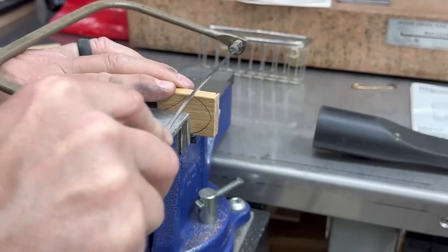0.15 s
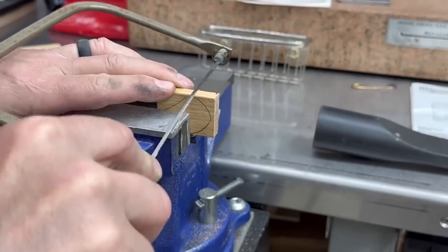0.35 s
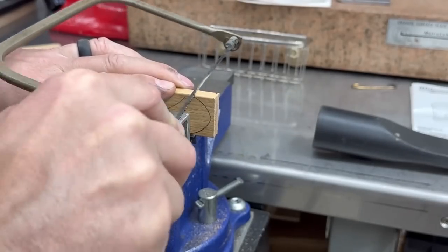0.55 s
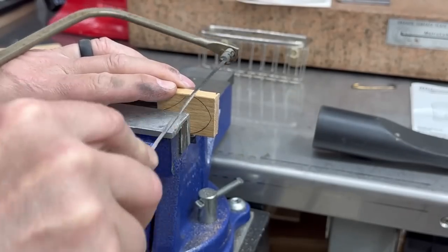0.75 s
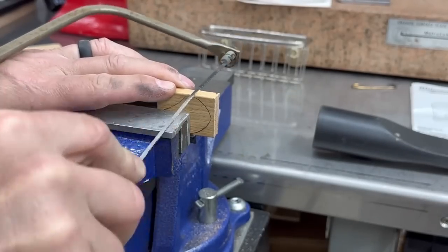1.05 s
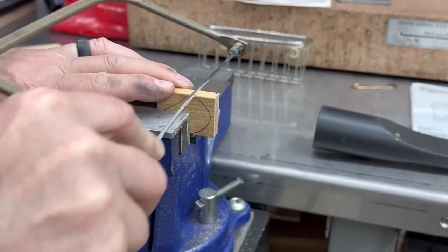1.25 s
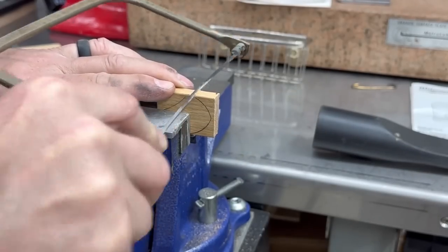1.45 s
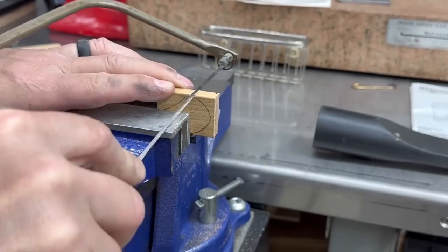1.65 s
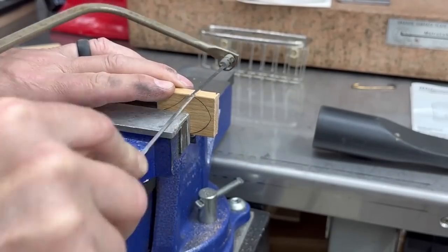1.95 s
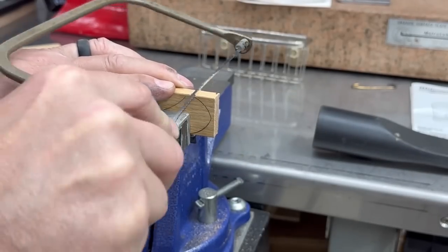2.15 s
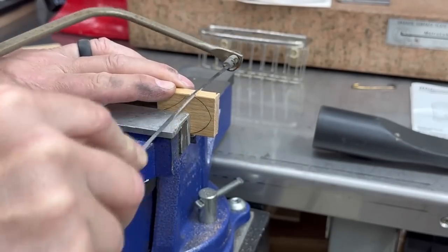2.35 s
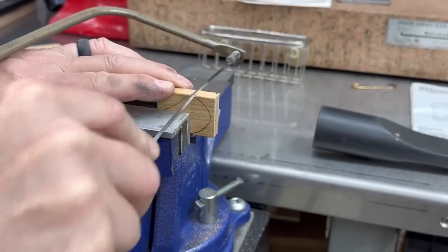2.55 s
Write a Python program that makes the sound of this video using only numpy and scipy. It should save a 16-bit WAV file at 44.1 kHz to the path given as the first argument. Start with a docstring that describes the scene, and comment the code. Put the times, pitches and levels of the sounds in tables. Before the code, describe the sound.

Quick dry sawing of a small wood block with a thin metal blade, steady and close

```python
"""In a dry workshop a jeweler's saw cuts a small wooden block in a vise, close to a stereo microphone.
Pulls and pushes alternate, about six strokes a second; tooth ticks and fibre crackle drive the dry rasp
and ring blade and block, while noise that follows the cutting force rings the bench.
Most pulls open with a tick and a soft thump; snags ping, the frame hums and a thin steel note swells once.
Steady room tone and a faint room tail lie around the saw; a short opposed echo gives a little width."""
import sys
import numpy as np
from scipy import signal
from scipy.fft import rfft, irfft, next_fast_len
from scipy.io import wavfile
from scipy.ndimage import uniform_filter1d

SR = 44100
rng = np.random.default_rng(int(sys.argv[2]) if len(sys.argv) > 2 else 0)


def to_wav(sig):
    """Store sig (one row per channel, or 1-D mono) as 16-bit WAV at the path in sys.argv[1].

    Samples outside -1..1 are clipped; the rate is SR.
    """
    pcm = np.clip(np.atleast_2d(sig), -1, 1) * 32767
    pcm = np.round(pcm).astype(np.int16)
    wavfile.write(sys.argv[1], SR, pcm.T)  # frames by channels


N = 119070

# Room tone behind the saw. Each row: frequency in Hz, relative density in dB per Hz.
ROOM_TONE_COLOUR = [(20, -1), (40, -3), (65, 4), (120, 4.5), (250, -2.5), (500, -18.5), (1000, -16.5),
                    (3500, -12), (7000, -23), (15000, -34)]
# Echo that is opposite in the two channels. Each row: frequency in Hz, gain in dB.
SIDE_LEVEL = [(60, -25), (250, -17), (400, -12), (600, -0.5), (800, -10), (1100, -9), (2100, -48),
              (3400, -14.5), (4300, -18), (5800, -39), (7200, -7), (8200, -56.5), (9400, -5), (11500, -35),
              (13600, -8), (15500, -15)]
# Phase by which the left microphone leads the right. Each row: frequency in Hz, lead in radians.
LEFT_LEAD = [(20, 0), (2600, .02), (3000, .45), (3400, .6), (4200, .33), (4900, .06), (6700, .03),
             (7300, 1), (7850, 3.08), (8700, 3.1), (9050, 1.9), (9800, .5), (10700, 0), (13000, 0),
             (13700, -.9), (14700, -1.4), (15600, -2.7)]
# Swells of the sprung frame. Each row: crest in seconds, level in dB.
HUMS = [(0.171, -48.5), (.52, -46.5), (.68, -48), (.85, -48.5), (1.01, -43), (1.186, -43.5), (1.315, -41.5),
        (1.495, -43), (1.631, -43.5), (1.82, -51), (1.98, -47), (2.16, -48.5), (2.275, -43.5)]
# Modes of the bench. Each row: frequency in Hz, width in Hz, relative level in dB.
BENCH_MODES = [(65.5, 48, -8), (130.7, 15.1, 0.5), (162.6, 28.2, -7.5), (228.5, 21.5, -0.5), (367, 43, -8),
               (524, 99, -16)]
# Modes of block and vise. Each row: frequency in Hz, width in Hz, relative level in dB.
BLOCK_MODES = [(642, 15, -5), (908.5, 19, 3), (1120, 120, -5), (1278, 13.6, 4), (1506, 25.5, 2),
               (1773, 50, 5.5), (1897, 86, -4), (2058, 82, 1), (2549, 36, 4)]
# Modes of blade and frame. Each row: frequency in Hz, width in Hz, relative level in dB.
BLADE_MODES = [(2503, 35, -12), (2710, 19, -11.5), (3136, 76, 0.5), (3358, 52, 4), (3498, 58, 0),
               (3695, 123, -1.5), (3896, 94, -6), (4158, 39, -5), (4313, 210, -9.5), (4566, 71, -8.5),
               (5050, 89, -16.5), (5390, 56, -10), (5664, 27, -15.5), (7430, 35, -11)]
# Colour of the dry rasp. Each row: frequency in Hz, relative density in dB per Hz.
RASP_COLOUR = [(200, -20.5), (750, -14.5), (1500, -11.5), (2850, -2), (3400, 7.5), (4400, 1), (6100, -3.5),
               (7200, -2), (7700, -7.5), (8300, 3), (9200, -9.5), (10500, -13), (12000, -16),
               (13100, -18.5), (13750, -10), (15000, -11.5), (15800, -28)]
# A tooth tears a fibre. Each row: start in seconds, level in dB.
SNAGS = [(.1145, -28.5), (.329, -29), (.986, -25.5), (1.124, -27.5), (1.158, -29), (1.6095, -33),
         (1.938, -17), (2.119, -23), (2.406, -36)]
# Teeth catch at the start of a pull. Each row: start in seconds, tick drive in dB, bench thump in dB.
BITES = [(0.2524, -37, -42.5), (0.5864, -47, -48), (.912, -41, -48), (1.23, -30, -40), (1.541, -32, -37),
         (1.876, -32, -36.5), (2.199, -23.5, -40), (2.505, -30.5, -48)]
# Pull and push in turn. Each row: start in seconds, then drive of rasp, blade, block and bench in dB.
STROKES = [(-.105, -42, -39.5, -50.5, -46), (.055, -45, -38, -49.5, -48), (.224, -43.5, -38, -50.5, -49),
           (.396, -44, -40.5, -52, -54.5), (.566, -42.5, -40, -48.5, -42.5),
           (.736, -44.5, -37.5, -48, -49.5), (.895, -41.5, -40, -46, -45), (1.056, -43, -36, -48.5, -53),
           (1.208, -41.5, -37, -50.5, -48), (1.371, -42.5, -35, -48.5, -48), (1.524, -41.8, -38, -50, -47),
           (1.69, -41, -35.5, -49, -49), (1.851, -41, -35, -48, -46.5), (2.016, -42, -33.4, -44.5, -50.5),
           (2.174, -40, -36, -45.5, -41.5), (2.336, -41.9, -35, -43.5, -50),
           (2.489, -40, -34.5, -44.5, -44), (2.649, -37.5, -32, -48.5, -49)]
LAST_TURN_S = 2.853  # end of the last stroke

# Place and microphone
ROOM_TONE_DB = -54.5
NEAR_DB, NEAR_T60_S = -2.5, 0.048  # short tail close to the saw
ROOM_DB, ROOM_T60_S = -22.5, 0.67
BASS_LEFT_DB = 1.7  # bass in the left channel over the right
LOW_CUT_HZ, EDGE_HZ = 33, 15800

# Frame, steel note, thumps, snags and ticks
HUM_HZ, HUM_SPREAD, HUM_WIDTH_S = 249.2, 0.02017, 0.03  # spread: share of the pitch
NOTE_CREST_S, NOTE_SWELL_S, NOTE_DECAY_S = 1.33, .08, .06
NOTE_HZ, NOTE_DB = 1269, -53.5
THUMP_LAG_S, THUMP_RISE_S = 0.014, .014
THUMP_HZ, THUMP_GLIDE_HZ_PER_S = 96, 750
SNAG_RISE_S, TICK_DECAY_S = 0.001, 0.0045

# Hand and cut
PULL_STICK_S, PUSH_STICK_S, STOP_S = .016, .015, .006  # the blade rests around each turn
PULL_SKEW, PUSH_SKEW = .88, 1.03  # where in the stroke the speed peaks
PULL_POWER, PUSH_POWER = 0.97, 1.3  # how force follows speed
PULL_DRAG, PUSH_DRAG, DRAG_RISE_S = 0.29, 0.18, 0.0017  # friction as soon as the blade may move
TEETH_PER_S, TOOTH_JITTER, TOOTH_SPREAD_DB = 900, .25, 2  # typical rate at top speed
FIBRES_PER_S, FIBRE_SPREAD_DB = 9000, 3.5
CHATTER_HZ, CHATTER_DB = 168, 0.46
PATCH_HZ, PATCH_DB = 43, 1.09  # each part is driven a little unevenly as the contact shifts
RASP_DB, BLADE_DB, BLOCK_DB, BENCH_DB = 3, -2, -2.5, -3.5  # gains on the stroke drives


def amp(db):
    """Decibels to gain."""
    return 10 ** (np.asarray(db) / 20)


def unit(x):
    """Scales to rms 1."""
    return x / np.sqrt(np.mean(x ** 2) + 1e-20)


def read(points, hz):
    """Reads a table on a log-frequency axis."""
    f, value = np.transpose(points)
    return np.interp(np.log(hz + 1), np.log(f + 1), value)


def add(mix, s, sound):
    """Mixes a sound in at time s in seconds."""
    part = mix[max(round(s * SR), 0):][:len(sound)]
    part += sound[:len(part)]


def filtered(x, response):
    """Applies a frequency response, given as a function of Hz."""
    size = next_fast_len(N + SR // 2)
    hz = np.fft.rfftfreq(size, 1 / SR)
    return irfft(rfft(x, size) * response(hz), size)[..., :N]


def colour(x, points):
    """Shapes the spectrum, keeping the power of white noise."""
    return filtered(x, lambda f: unit(amp(read(points, f))))


def ring(x, modes):
    """Rings decaying modes, wider ones dying sooner, keeping the power of white noise."""
    t = np.arange(SR // 4) / SR
    h = np.zeros(len(t))
    for k, (hz, width, db) in enumerate(modes):
        decay = np.exp(-np.pi * abs(width) * t)
        h += (-1) ** k * amp(db) * width * decay * np.cos(2 * np.pi * hz * t)
    return signal.fftconvolve(x, h / np.linalg.norm(h))[:N]


def wander(rate_hz):
    """Smooth chance of rms 1, slower than about rate_hz."""
    return unit(filtered(rng.standard_normal(N), lambda f: 1 / (1 + (f / rate_hz) ** 4)))


def room_tone():
    """Steady noise with the colour of the quiet room."""
    return amp(ROOM_TONE_DB) * colour(rng.standard_normal(N), ROOM_TONE_COLOUR)


def echoes(x, t60):
    """A tail of sparse reflections of either sign that falls 60 dB in t60 seconds."""
    t = np.arange(SR // 2) / SR
    sign = rng.choice([-1., 1.], len(t))
    present = (rng.random(len(t)) < 2000 / SR) * (t > .001)
    taps = sign * present * amp(-60 * t / t60)
    return signal.fftconvolve(x, taps / np.linalg.norm(taps))[:N]


def frame_hums():
    """Soft swelling notes of the sprung frame's lowest mode, each a little detuned."""
    out, t = np.zeros(N), np.arange(N) / SR
    for crest, db in HUMS:
        detune, phase = rng.uniform(-1.017, 1, 2)
        tone = np.sin(2 * np.pi * (HUM_HZ * (1 + HUM_SPREAD * detune) * t + phase))
        out += amp(db) * np.exp(-((t - crest) / HUM_WIDTH_S) ** 2) * tone
    return out


def steel_note():
    """A thin steel note that swells and fades once, its phase wavering."""
    t = np.arange(N) / SR - NOTE_CREST_S
    swell = np.exp(-(t / np.where(t < 0, NOTE_SWELL_S, NOTE_DECAY_S)) ** 2)
    return amp(NOTE_DB) * swell * np.sin(2 * np.pi * NOTE_HZ * t + 0.28 * wander(25))


def bench_thumps():
    """The bench takes the load of each bite with a soft thump of rising pitch."""
    out, t = np.zeros(N), np.arange(SR // 8) / SR
    u = t / THUMP_RISE_S
    swell = (u * np.exp(1 - u)) ** 2
    for s, _, db in BITES:
        turns = THUMP_HZ * t + THUMP_GLIDE_HZ_PER_S * t ** 2 / 2 + rng.random()
        add(out, s + THUMP_LAG_S, amp(db) * swell * np.sin(2 * np.pi * turns))
    return out


def snags():
    """A caught tooth lets go and the blade pings for a moment at one of its modes."""
    out, t = np.zeros(N), np.arange(SR // 30) / SR
    u = t / SNAG_RISE_S
    ping = u * np.exp(1 - u) * np.sin(2 * np.pi * BLADE_MODES[3][0] * t)
    for s, db in SNAGS:
        add(out, s, amp(db) * ping)
    return out


def bite_ticks():
    """Short decaying bursts of noise as the teeth catch."""
    out, t = np.zeros(N), np.arange(SR // 30) / SR
    for s, db, _ in BITES:
        add(out, s, amp(db) * np.exp(-t / TICK_DECAY_S) * rng.standard_normal(len(t)))
    return out


def hand():
    """The arm swings to and fro: stroke number, blade speed and cutting force at each moment."""
    t = np.arange(N) / SR
    turns = np.array([row[0] for row in STROKES] + [LAST_TURN_S])
    stroke = np.clip(np.searchsorted(turns, t) - 1, 0, len(STROKES) - 1)
    pull = stroke % 2 == 0
    start = turns[stroke] + np.where(pull, PULL_STICK_S, PUSH_STICK_S)
    progress = np.clip((t - start) / (turns[stroke + 1] - STOP_S - start), 0, 1)
    speed = abs(np.sin(np.pi * progress ** np.where(pull, PULL_SKEW, PUSH_SKEW)))
    onset = np.clip((t - start) / DRAG_RISE_S, 0, 1)
    drag = np.where(pull, PULL_DRAG, PUSH_DRAG) * onset * (1 - progress)
    force = drag * (1 - speed) + speed ** np.where(pull, PULL_POWER, PUSH_POWER)
    return stroke, speed, force


def tooth_ticks(speed):
    """One uneven tick per tooth, coming faster with blade speed."""
    rate = TEETH_PER_S * (.4 + .6 * speed) * np.exp(TOOTH_JITTER * wander(300))
    passing = np.diff(np.floor(np.cumsum(rate) / SR), prepend=0)
    teeth = passing * amp(TOOTH_SPREAD_DB * np.clip(rng.standard_normal(N), -2, 1.5))
    return unit(teeth - uniform_filter1d(teeth, size=101))  # takes out the slow offset


def fibre_crackle():
    """Parting fibres: fine random clicks of either sign."""
    present = rng.random(N) < FIBRES_PER_S / SR
    return unit(present * rng.choice([-1, 1], N) * amp(FIBRE_SPREAD_DB * rng.standard_normal(N)))


def dry_rasp(drive, teeth, fibres, bite):
    """Mostly fibre crackle, coloured and thickened by a short tail of near reflections."""
    cut = amp(RASP_DB) * drive * unit(0.23 * teeth + fibres)
    direct = colour(cut + amp(-11) * bite, RASP_COLOUR)
    return (direct + amp(NEAR_DB) * echoes(direct, NEAR_T60_S)) / np.hypot(1, amp(NEAR_DB))


def blade_ring(drive, teeth, bite):
    """Tooth ticks and some noise ring the steel of blade and frame."""
    scrape = unit(teeth + 0.29 * rng.standard_normal(N))
    return ring(amp(BLADE_DB) * drive * scrape + amp(-10.5) * bite, BLADE_MODES)


def block_ring(drive, teeth, fibres, bite):
    """Fibres and teeth ring the wood and the vise that holds it."""
    cut = unit(0.42 * teeth + fibres)
    return ring(amp(BLOCK_DB) * drive * cut + amp(-19.5) * bite, BLOCK_MODES)


def bench_shake(drive, force):
    """Noise rings the low bench modes; it follows the force only weakly."""
    return ring(amp(BENCH_DB) * drive * force ** 0.34 * rng.standard_normal(N), BENCH_MODES)


def saw():
    """One hand motion drives rasp, blade, block and bench; returns the bright part and the bass."""
    stroke, speed, force = hand()
    grip = force * unit(amp(CHATTER_DB * wander(CHATTER_HZ)))
    levels = np.array(STROKES)[stroke, 1:].T
    rasp, blade, block, bench = [amp(db + PATCH_DB * wander(PATCH_HZ)) for db in levels]
    teeth, fibres, bite = tooth_ticks(speed), fibre_crackle(), bite_ticks()
    bright = dry_rasp(rasp * grip, teeth, fibres, bite)
    bright += blade_ring(blade * grip, teeth, bite)
    bright += block_ring(block * grip, teeth, fibres, bite)
    bass = bench_shake(bench, force)
    bright += snags() + steel_note()
    bass += bench_thumps() + frame_hums()
    return bright, bass


def scene():
    """The saw over quiet room tone; a faint short echo, opposite in the two channels, gives a little width."""
    bright, bass = saw()
    background = room_tone()
    middle = bright + amp(ROOM_DB) * echoes(bright, ROOM_T60_S) + background
    side = filtered(echoes(middle + bass, NEAR_T60_S), lambda f: amp(read(SIDE_LEVEL, f)))
    bass_pair = bass * amp([[BASS_LEFT_DB / 2], [-BASS_LEFT_DB / 2]])
    return middle + bass_pair + np.array([side, -side])


def record(dry):
    """The microphone pair shifts phase between channels, sheds the deepest bass and limits the band."""
    def pair(f):
        half_lead = .5 * np.array([[1], [-1]]) * read(LEFT_LEAD, f)
        return np.exp(1j * half_lead) / (1 + (LOW_CUT_HZ / (f + 1)) ** 6)

    low_pass = signal.firwin(511, EDGE_HZ, window=("kaiser", 9), fs=SR)
    return signal.oaconvolve(filtered(dry, pair), low_pass[None], "same")


dry = scene()
out = record(dry)
to_wav(out)
```